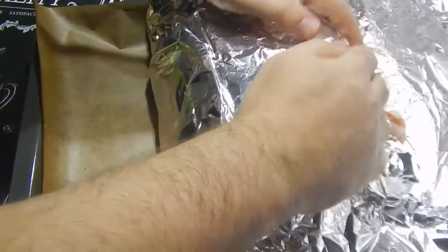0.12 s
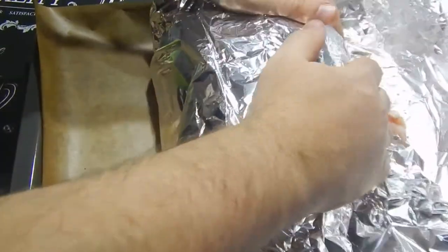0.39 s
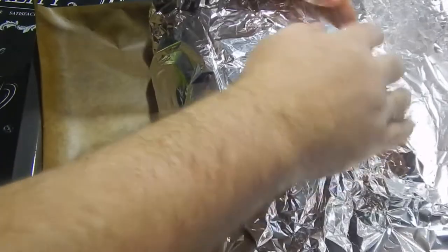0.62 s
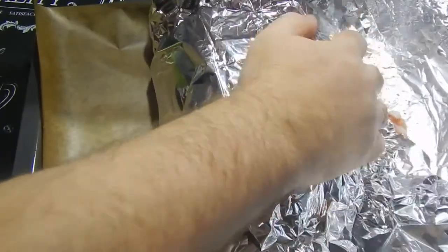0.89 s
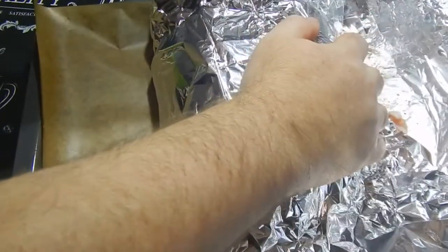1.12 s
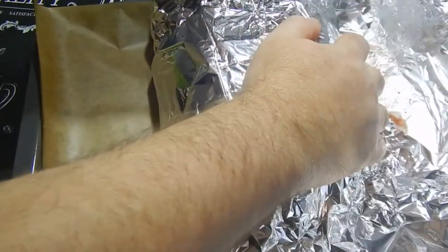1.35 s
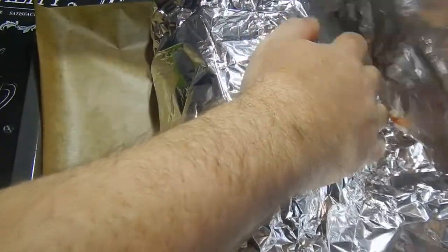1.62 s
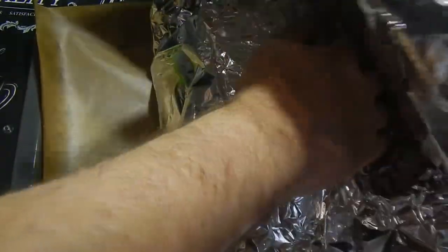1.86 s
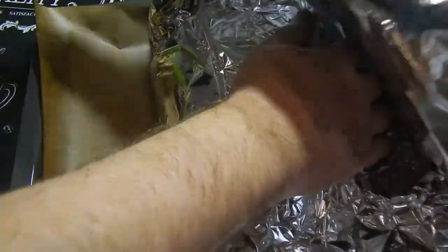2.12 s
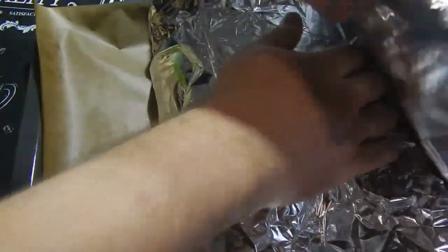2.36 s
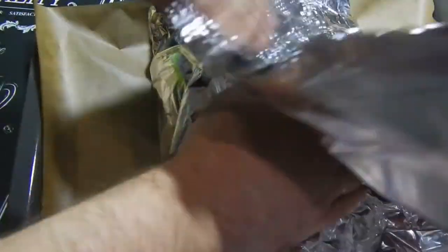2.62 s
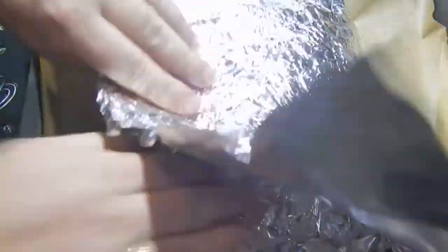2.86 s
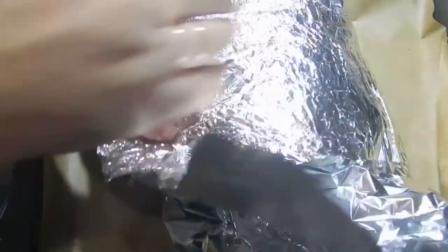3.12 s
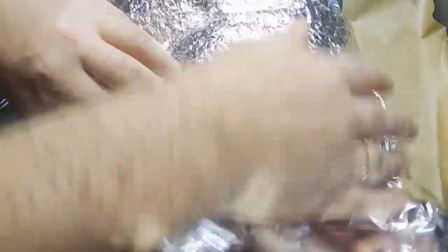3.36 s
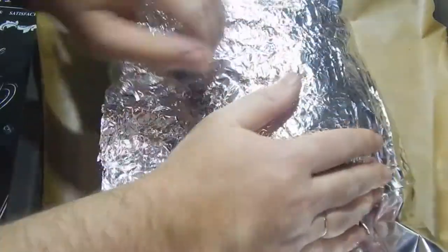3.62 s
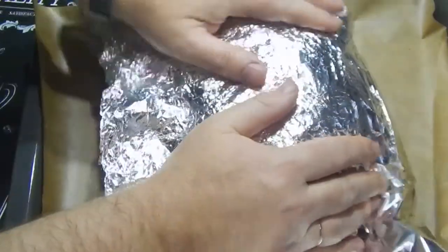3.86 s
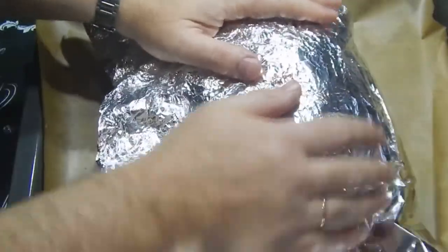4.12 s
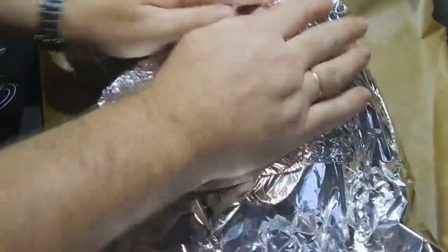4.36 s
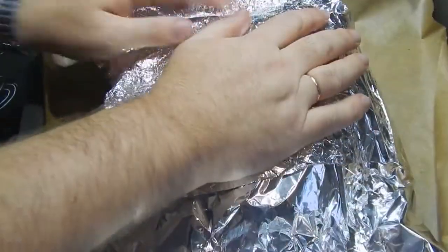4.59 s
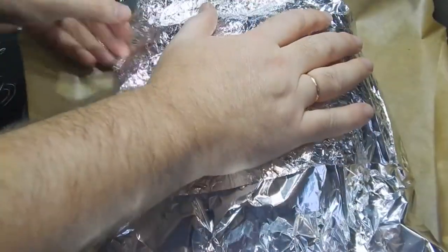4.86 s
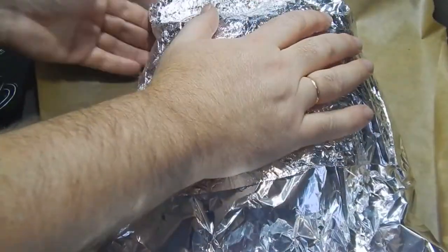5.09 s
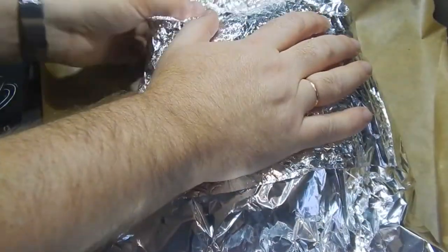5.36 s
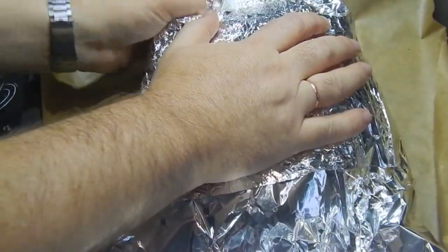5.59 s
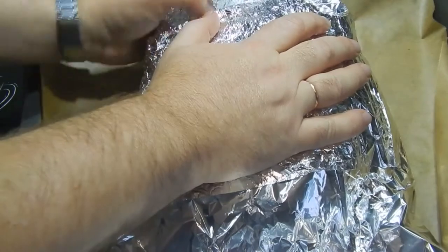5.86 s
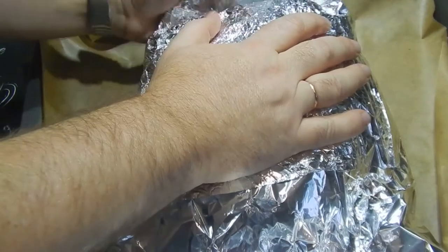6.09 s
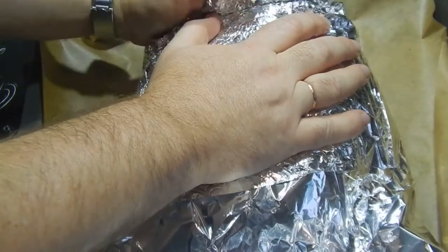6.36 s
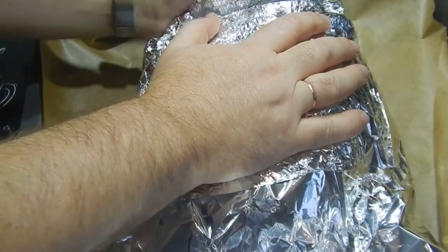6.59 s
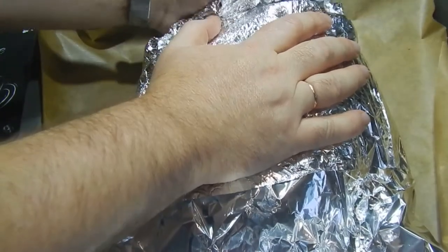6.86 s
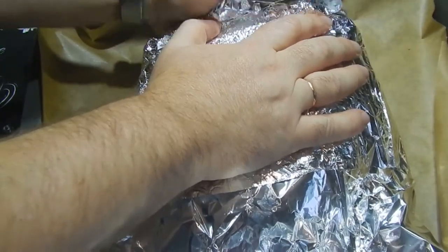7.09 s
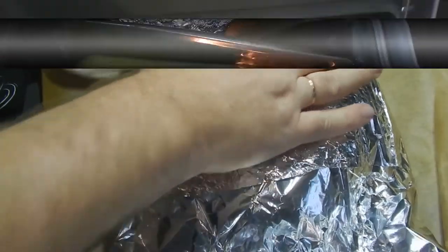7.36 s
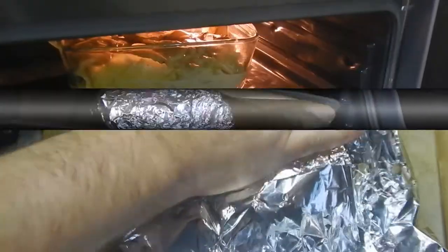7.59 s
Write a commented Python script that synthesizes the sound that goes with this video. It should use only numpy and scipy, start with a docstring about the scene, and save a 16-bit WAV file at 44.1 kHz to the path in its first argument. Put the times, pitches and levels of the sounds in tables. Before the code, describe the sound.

Stereo close microphone, dry small room: dense foil rustle, fizzing and popping, mostly slightly left of centre. Early crinkles pause, then big sheet folds hiss and crackle, pressing makes the tray boom softly. Later handling is choppier, with single bright ticks, thinning out to small rustles and a weak wavering hum.

```python
"""In a small kitchen, hands fold and press aluminium foil round a roast on a baking tray, close to a camera.
Fingers drag over the foil and thousands of tiny creases snap, each a sine that swells and dies.
Small creases fizz, middling ones crackle, larger facets buckle and ring briefly; filtered noise is the thud.
The tray's resonances boom under the pressing, and the room adds a short diffuse tail.
At the end a low, wavering hum enters. Two narrow notch filters sit in the camera's sound path."""
import sys
import numpy as np
from scipy import signal
from scipy.fft import rfft, irfft, next_fast_len
from scipy.io import wavfile
from scipy.ndimage import map_coordinates

SR = 44100
rng = np.random.default_rng(int(sys.argv[2]) if len(sys.argv) > 2 else 0)


def unload_audio(sound):
    """Save the sound as a 16-bit wav file, at the path given as the first command line argument."""
    columns = np.transpose(np.atleast_2d(sound))
    # keep every value between -1 and 1, then stretch to whole-number steps
    steps = np.round(np.clip(columns, -1, 1) * 32767)
    wavfile.write(sys.argv[1], SR, steps.astype(np.int16))


def volts_from_db(level):
    """Convert decibel levels to linear amplitude ratios."""
    exponent = np.asarray(level, float) / 20
    return 10 ** exponent


N = 340452

# Where the foil is worked. Each row: time in seconds, facet pitch in Hz,
# left-right balance in dB (positive is left).
WORKED_PLACE = [(0.0, 1520, -6.5), (0.19, 1158, -7.5), (0.73, 1313, -1), (0.84, 1706, -6), (1.24, 1490, -2),
                (1.35, 1150, -14), (1.44, 1400, -7.0), (2.51, 1447, -5.5), (3.03, 1380, -0.5),
                (3.38, 1046, -2), (3.59, 1540, -2.0), (4.26, 1224, -2.0), (5.01, 1557, 3.0), (5.1, 1030, 2),
                (5.16, 1716, 3.5), (5.44, 1220, -2), (5.61, 1710, -2), (5.68, 980, -3), (5.76, 1630, 0.0),
                (5.83, 1147, -0.5), (6.56, 1482, -4.5), (6.64, 995, -5.5), (7.07, 1587, -6.5),
                (7.1, 1220, -1), (7.46, 1268, -8), (7.72, 1450, -3)]


def unit(x):
    """Normalisation: the signal scaled to an rms of 1."""
    return x / np.sqrt(np.mean(x ** 2) + 1e-20)


def along(points, hz):
    """Interpolation of (Hz, value) points on a logarithmic frequency axis."""
    f, v = np.transpose(points)
    return np.interp(np.log(hz + 1), np.log(f + 1), v)


def read(rows, s):
    """Linear interpolation in time: each column after the first, at times s."""
    times, *columns = np.transpose(rows)
    return [np.interp(s, times, c) for c in columns]


def wobble(rate):
    """Band-limited random modulation: a smooth curve through random knots, rate knots a second."""
    knots = rng.standard_normal(int(N * rate / SR) + 4)
    return map_coordinates(knots, [np.arange(N) * rate / SR])


def filtered(x, response):
    """Linear filtering: the spectrum of x times a complex response of frequency."""
    m = next_fast_len(N + SR // 2)
    return irfft(rfft(x, m) * response(np.fft.rfftfreq(m, 1 / SR)), m)[..., :N]


def coloured(x, spectrum):
    """Spectral shaping: x through a zero-phase filter of (Hz, gain in dB) points, scaled to rms 1."""
    return unit(filtered(x, lambda hz: volts_from_db(along(spectrum, hz))))


def swells(s, hold_s, db, rise, fall):
    """Energy addition: dB level of overlapping gestures that rise, hold and die at rates in dB per second."""
    t = np.arange(0, N, 64) / SR
    late = t - s[:, None]
    rising_db = rise * np.minimum(late, 0)
    dying_db = np.c_[fall] * np.maximum(late - hold_s[:, None], 0)
    each_db = db[:, None] + rising_db - dying_db
    total_db = 10 * np.log10(np.sum(volts_from_db(each_db) ** 2, axis=0) + 1e-12)
    return np.interp(np.arange(N) / SR, t, total_db)


def pings(s, gain, hz, cycles, lag_s, pan_db, size):
    """Damped vibration: sines swell for some cycles and die, with a time and level difference at two ports."""
    out = []
    for side in (1, -1):  # left, right
        start = np.clip(s + side * lag_s / 2, 0, N / SR) * SR
        where = np.ceil(start)[:, None] + np.arange(size)
        turns = ((where - start[:, None]) / SR * hz[:, None]).astype(np.float32)
        age = turns / cycles[:, None].astype(np.float32)
        envelope = age * np.exp(1 - age)
        port_gain = (gain * volts_from_db(side * pan_db / 2))[:, None]
        wave = np.sin(2 * np.pi * turns) * envelope * port_gain
        out.append(np.bincount(where.astype(int).ravel(), wave.ravel(), N + size + 1)[:N])
    return np.array(out)


def creases(count, centre_hz, spread, cycles, spiky_db, clumps_db, lag_s, size):
    """Crackling noise: a shower of snaps, random in time, pitch and strength, with clumped loudness, rms 1."""
    u, g = rng.random((count, 2)), rng.standard_normal((count, 4))
    s = u[:, 0] * N / SR
    hz = np.clip(centre_hz(s) * np.exp(spread * g[:, 3]), 200, 0.4 * SR)
    rare = -np.log(1 - u[:, 1] * 0.998)  # exponentially distributed
    gain = np.sqrt(hz) * volts_from_db(clumps_db[(s * SR).astype(int)] + spiky_db * rare)
    # the farther port hears a snap later
    lag = lag_s * g[:, 1] - 0.75e-5 * read(WORKED_PLACE, s)[1]
    return unit(pings(s, gain, hz, cycles * np.exp(0.17 * g[:, 0]), lag, 4.3 * g[:, 2], size))


def fizz(fizz_db, facet_db, clumps_db):
    """High-frequency snapping: tiny creases over dense noise, brighter where the foil buckles less."""
    # Each row: frequency in Hz, relative filter gain in dB.
    fizz_spectrum = [(3200, -18), (4800, -6), (6000, -5), (7500, -3), (10600, 2.5), (13000, -1),
                     (15000, -5), (15800, -11.5)]
    # Slow drift of the fizz's brightness. Each row: time in seconds, further top-octave lift in dB.
    brightness_drift = [(0, 0), (0.9, 0), (1.3, 3), (2.4, 1), (3.2, 0), (4.3, 0), (4.8, -2.5), (5.4, -1),
                        (6.4, 0), (6.8, -6), (7.2, -3.5), (7.72, -1)]
    shine_per_db, crumpled_db = 0.39, -8  # at facets 8 dB under the fizz the shine is 0 dB before the drift
    small = creases(count=40000, centre_hz=lambda s: 9500, spread=0.5, cycles=0.54, spiky_db=1.5,
                    clumps_db=clumps_db, lag_s=6e-5, size=28)
    # the finest creases are too many to hear apart and merge into hiss
    finest = 1.08 * volts_from_db(clumps_db) * rng.standard_normal((2, N))
    even = coloured(small + finest, fizz_spectrum)
    top = filtered(even, lambda hz: 1 / (1 + (8500 / (hz + 1)) ** 6))
    shine_db = np.clip(shine_per_db * (crumpled_db + fizz_db - facet_db), -9, 7)
    shine_db = shine_db + read(brightness_drift, np.arange(N) / SR)[0]
    return even + (volts_from_db(shine_db) - 1) * top


def crackle(clumps_db):
    """Impulsive buckling at medium scale: middling creases snap between the fizz and the facets in pitch."""
    # Each row: frequency in Hz, relative filter gain in dB.
    crackle_spectrum = [(1100, -15.5), (1900, -4.5), (2700, -2), (4200, -3.5), (5500, -5), (8000, -28)]
    middling = creases(count=11000, centre_hz=lambda s: 3300, spread=0.384, cycles=1.13, spiky_db=-1.0,
                       clumps_db=clumps_db, lag_s=5e-5, size=110)
    return coloured(middling, crackle_spectrum)


def facets(clumps_db):
    """Plate buckling: large facets snap near the pitch of the fold being worked, and a few ring on."""
    # Each row: frequency in Hz, relative filter gain in dB.
    facet_spectrum = [(350, -20.5), (600, 0), (1000, -1), (1600, -1), (2300, 3), (3300, -12), (5000, -44)]
    fold_hz = lambda s: read(WORKED_PLACE, s)[0]
    large = creases(count=9000, centre_hz=fold_hz, spread=0.45, cycles=1.15, spiky_db=0.7,
                    clumps_db=clumps_db, lag_s=6e-5, size=230)
    ringing = creases(count=900, centre_hz=fold_hz, spread=0.249, cycles=6.2, spiky_db=1.5,
                      clumps_db=clumps_db, lag_s=6e-5, size=1100)
    return coloured(large + 0.58 * ringing, facet_spectrum)


def tray_boom(facet_db, clumps_db):
    """Modal resonance: presses and, more weakly, buckling facets kick the hollow tray's modes."""
    # Modes of the tray. Each row: frequency in Hz, width in Hz, relative level in dB.
    modes = [(368.7, 49, -3.5), (455.3, 40, 3), (537, 38, -1), (617, 90, -5.5)]
    # Presses that kick the tray. Each row: time in seconds, hold in seconds, relative level in dB.
    presses = [(-0.005, 0.047, -52.5), (0.217, 0.055, -43.5), (0.4, 0.049, -47), (0.56, 0.093, -51.5),
               (0.662, 0.001, -50.7), (0.843, 0.073, -61), (0.966, 0.001, -67), (1.364, 0.001, -57.5),
               (1.469, 0.07, -53), (1.731, 0.18, -49), (1.932, 0.0047, -47.5), (2.37, 0.11, -52.5),
               (2.554, 0.00032, -46.5), (2.67, 0.18, -48), (2.846, 0.052, -38), (3.094, 0.298, -50.9),
               (3.444, 0.16, -44), (3.846, 0.16, -37), (4.143, 0.139, -56.5), (4.32, 0, -46),
               (4.445, 0.0055, -35.5), (4.522, 0.001, -38), (4.79, 0.051, -52), (5.078, 0.037, -58),
               (5.216, 0.0, -63.5), (5.327, 0.002, -55.3), (5.388, 0.011, -46), (5.51, 0.001, -42.5),
               (5.673, 0.001, -47), (5.901, 0.0, -38.5), (5.984, 0.0, -31), (6.253, 0.001, -42),
               (6.752, 0.011, -50.5), (6.917, 0.001, -44.5), (7.024, 0.002, -56), (7.117, 0.001, -63),
               (7.378, 0.036, -63), (7.587, 0.001, -64)]
    press_db = swells(*np.transpose(presses), rise=360, fall=152.5)
    gain = np.hypot(volts_from_db(press_db), volts_from_db(facet_db - 14.5))
    kicks = creases(count=4000, centre_hz=lambda s: 480, spread=0.26, cycles=0.51, spiky_db=1.6,
                    clumps_db=clumps_db, lag_s=6e-5, size=200)

    def hollow(f):
        """Sum of resonances in alternating sign."""
        total = 0
        for k, (centre, width, db) in enumerate(modes):
            damping = 1j * f * width
            total = total + (-1) ** k * volts_from_db(db) * damping / (centre ** 2 - f ** 2 + damping)
        return total

    return volts_from_db(1.2 * wobble(18) - 1.5) * gain * unit(filtered(kicks, hollow))


def parcel_thud(facet_db):
    """Low-frequency forcing: noise, largely common to both ports, swells as the parcel's weight shifts."""
    # Each row: frequency in Hz, relative filter gain in dB.
    thud_spectrum = [(25, -17), (60, -10), (110, -5), (135, -3.5), (163, -2), (195, -8.5), (300, -6.5),
                     (420, -13.5), (700, -90)]
    # Shifts of weight. Each row: time in seconds, hold in seconds, level in dB.
    shifts = [(0.009, 0.031, -62), (0.307, 0.085, -54), (0.536, 0.13, -63), (0.772, 0.0094, -64),
              (0.852, 0.0068, -61), (1.161, 0.13, -83), (1.364, 0.029, -73), (1.633, 0.011, -65),
              (1.759, 0.033, -51.0), (1.91, 0.001, -50), (2.169, 0.009, -64.5), (2.342, 0.032, -53.5),
              (2.563, 0.0091, -53.5), (2.695, 0.011, -57.1), (2.81, 0.13, -57.4), (3.15, 0.001, -57.5),
              (3.344, 0.006, -62), (3.468, 0.03, -52.5), (3.576, 0.018, -51), (3.846, 0.0089, -45.5),
              (3.988, 0.001, -45), (4.259, 0.11, -60), (4.437, 0.083, -52), (4.77, 0.037, -63),
              (4.91, 0.001, -52), (5.41, 0.001, -70), (5.539, 0.04, -66), (5.747, 0.015, -66),
              (5.898, 0.2, -54.5), (6.398, 0.001, -79.1), (6.65, 0.003, -59.5), (6.793, 0.094, -61.5),
              (7.38, 0.08, -65), (7.56, 0.16, -62)]
    shift_db = swells(*np.transpose(shifts), rise=379, fall=114)
    # buckling facets move the parcel too, more weakly
    gain = np.hypot(volts_from_db(shift_db), volts_from_db(facet_db - 28))
    noise = rng.standard_normal(N) + 0.46 * rng.standard_normal((2, N))
    return gain * coloured(noise, thud_spectrum)


def foil():
    """Superposition: five sizes of movement follow the hands, shaded as the action drifts left and right."""
    # The hands' strokes. Each row: time of full strength in seconds, hold in seconds, relative fizz level in dB,
    # large facets over the fizz in dB, dying away in dB per second.
    strokes = [(-0.005, 0.013, -38, -10, 109.5), (0.154, 0.071, -37.5, -2.5, 230.0),
               (0.227, 0.035, -34.5, -6.5, 240.0), (0.278, 0.009, -32.5, -5, 51.5),
               (0.37, 0.021, -33, -5, 370.0), (0.564, 0.1, -62.5, 11.9, 189),
               (0.809, 0.063, -48.5, -4.8, 140.0), (1.05, 0.008, -72, -1, 220.0),
               (1.078, 0.024, -65.5, -14.3, 220.0), (1.223, 0.002, -77.7, -5, 180.0),
               (1.271, 0.001, -71, -5, 220.0), (1.37, 0.0036, -35.5, -12.5, 59),
               (1.453, 0.033, -34.5, -11.5, 128), (1.522, 0.001, -41, -6.5, 190.0),
               (1.578, 0.017, -35.5, -10, 280.0), (1.635, 0.19, -37, -12, 112), (1.809, 0.11, -35, -8, 108),
               (1.994, 0.039, -38, -12, 233), (2.276, 0.004, -68, -4, 184), (2.354, 0.023, -31.5, -15, 46),
               (2.539, 0.097, -33.0, -9, 210.0), (2.65, 0.013, -29.5, -13.5, 55),
               (2.721, 0.015, -31.5, -13, 85), (2.839, 0.06, -32.5, -9, 160.0),
               (3.109, 0.052, -36.5, -8.0, 150.0), (3.172, 0.013, -36.5, -8, 39),
               (3.322, 0.024, -40, -4.5, 215), (3.387, 0.094, -30.0, -9.5, 101.5),
               (3.477, 0.098, -31.5, -8, 80.0), (3.639, 0.01, -32, -6.5, 251),
               (3.826, 0.067, -27.5, -7.5, 39.5), (3.978, 0.019, -27, -6.6, 148),
               (4.151, 0.031, -33.5, -10.6, 198), (4.224, 0.021, -36.5, -6, 220.0),
               (4.323, 0.084, -41, -1.2, 205), (4.408, 0.061, -28, -4.5, 133),
               (4.694, 0.0085, -61, 4.5, 282), (4.789, 0.11, -71, 26.5, 210.0),
               (4.881, 0.028, -27.5, -4, 164), (4.977, 0.021, -35.5, -9.5, 160.0),
               (5.071, 0.005, -38, -3.5, 100.0), (5.176, 0.094, -36.5, -10, 160.0),
               (5.29, 0.0083, -29.5, -11, 101), (5.376, 0.017, -29.5, -6.5, 47),
               (5.5, 0.038, -35.5, -8.5, 220.0), (5.62, 0.112, -43.5, -8, 220.0),
               (5.69, 0.048, -33.5, -5.5, 320.0), (5.807, 0.064, -37, -0.5, 200.0),
               (5.91, 0.086, -31, -5.5, 71), (6.095, 0.062, -31.5, -7.0, 128),
               (6.186, 0.032, -35.5, -5.5, 180.0), (6.245, 0.033, -31.5, -6.5, 217),
               (6.404, 0.002, -47.5, -7.5, 170.0), (6.523, 0.005, -74, 12, 420.0),
               (6.657, 0.005, -44, 1.5, 380.0), (6.722, 0.004, -35.5, -3.2, 140.0),
               (6.859, 0.097, -36.5, -3.5, 160.0), (6.973, 0.14, -38.5, -13, 160.0),
               (7.178, 0.0086, -50, -11, 320.0), (7.238, 0.0063, -46.5, -12.5, 160.0),
               (7.282, 0.055, -49, -13, 134), (7.458, 0.092, -65.5, -6, 170.0),
               (7.533, 0.1, -39.0, -9.5, 230.0), (7.677, 0.034, -40, -11, 170.0)]
    s, hold_s, db, coarse_db, fall = np.transpose(strokes)
    rise = 557  # dB per second
    fizz_db = swells(s, hold_s, db, rise, fall)
    crackle_db = swells(s, hold_s, db + 0.6 * coarse_db - 4, rise, fall)
    facet_db = swells(s, hold_s, db + coarse_db, rise, fall)
    # one crease sets off its neighbours, so all sizes clump together
    clumps_db = 0.6 * wobble(14) + 0.86 * wobble(40) + 0.85 * wobble(110) + 0.44 * wobble(300)
    # the camera body shades the far port more from short waves than from long ones
    shade_db = read(WORKED_PLACE, np.arange(N) / SR)[1] * [[0.5], [-0.5]]
    fine = volts_from_db(fizz_db - 0.5 + 0.93 * shade_db) * fizz(fizz_db, facet_db, clumps_db)
    medium = volts_from_db(crackle_db + 0.4 * shade_db) * crackle(clumps_db)
    coarse = volts_from_db(facet_db - 2.5) * facets(clumps_db) + tray_boom(facet_db, clumps_db)
    return fine + medium + volts_from_db(0.25 * shade_db) * coarse + parcel_thud(facet_db)


def kitchen(x, wet_db):
    """Reverberation: a short diffuse tail, drawn afresh every third of a second so no one colouring persists."""
    # Each row: frequency in Hz, 60 dB decay time in seconds.
    decay = [(200, 0.1), (2000, 0.16), (10000, 0.08)]
    step = SR // 3
    wet = np.zeros((2, N + 3 * step))
    for start in range(0, N, step):
        hz, t, z = signal.stft(rng.standard_normal((2, step)), SR, nperseg=256)
        # the bass is nearly alike at both ports, the treble is not
        apart = np.clip(hz / 3500 + 0.2, 0, 1)[:, None]
        z = np.array([z[0] + apart * z[1], z[0] - apart * z[1]]) / np.sqrt(1 + apart ** 2)
        dying = volts_from_db(-60 * t / along(decay, hz)[:, None])
        tail = signal.istft(z * dying, SR, nperseg=256)[1]
        tail = tail / np.linalg.norm(tail[0])
        answer = signal.fftconvolve(x[:, start:start + step], tail, axes=1)
        wet[:, start:start + answer.shape[1]] += answer
    return x + volts_from_db(wet_db) * wet[:, :N]


def faint_hiss():
    """White noise: equal power at all frequencies, independent at each port."""
    return volts_from_db(-87.5) * rng.standard_normal((2, N))


def snaps():
    """Sudden release of strain: the loudest creases ping singly, then a flurry of smaller ones dies away."""
    # Loud snaps and, at low pitch, knocks. Each row: time of the peak in seconds, peak level in dB,
    # pitch in Hz, rise in cycles, left-right balance in dB (positive is left).
    single_snaps = [(0.1612, -33.5, 1110, 1.36, -3), (0.2056, -28.5, 1048, 1.28, 0),
                    (0.2303, -29.5, 1090, 1.23, -4), (0.2847, -26, 2280, 1.14, -1),
                    (0.3331, -38, 1104, 1.7, -6), (0.84, -41, 1710, 4.0, 5), (1.0496, -59, 1560.0, 3.95, 9),
                    (1.0811, -48, 9830.0, 0.9, -7), (1.1141, -48, 10500, 1.3, -11),
                    (1.2735, -52, 10000.0, 0.9, -8), (1.3143, -50.5, 11100.0, 0.9, -5),
                    (1.3694, -35, 800, 1.17, 4), (1.4419, -38, 980, 0.62, -3.0),
                    (1.6328, -22, 10290.0, 0.88, -10), (1.7502, -27.5, 2230, 0.86, 4),
                    (2.001, -19, 11200, 1.1, -3.5), (2.1079, -45.5, 2320, 1.9, 5),
                    (2.182, -49, 356, 6.5, -1.0), (2.2777, -47, 9520.0, 0.9, -9), (2.327, -47, 130, 0.8, 0),
                    (2.3392, -18.5, 11800, 1.4, -19), (2.856, -25.5, 596, 0.81, 5.5),
                    (3.2748, -20.5, 12270.0, 0.9, 1), (3.3895, -14, 10540.0, 1.04, -2.5),
                    (3.9237, -11.5, 11340.0, 1.1, 1), (4.0093, -22, 2520, 0.8, -7),
                    (4.7654, -40, 900, 1.5, -1), (4.7794, -32, 1610, 1.6, -1), (4.8466, -30, 1600, 2.8, 2),
                    (4.8645, -22, 1780, 0.79, -4), (4.887, -29, 1790, 0.53, -2),
                    (4.9185, -31, 1650, 1.3, -6), (4.9932, -14, 9500, 0.42, 5),
                    (5.0863, -42, 990, 3.56, -1.0), (5.2038, -33.5, 1700, 1.05, 0.0),
                    (5.436, -14, 10300, 0.7, -1), (5.6254, -22, 10400, 0.9, -1),
                    (5.7453, -31.5, 10500, 0.7, -4), (5.7533, -31, 1590, 1.7, -1),
                    (5.8009, -24.5, 2040, 1.2, 0.5), (5.8324, -27, 2010, 0.82, -5),
                    (5.8864, -24, 10230.0, 0.6, -1), (6.1881, -27, 1190, 0.9, 1),
                    (6.272, -27, 1390, 1.14, 1), (6.2712, -19.5, 6800, 0.9, -2),
                    (6.293, -29.5, 1500, 1.34, -1), (6.4104, -27, 11760.0, 1, 0.5),
                    (6.4648, -43, 11910.0, 0.9, 0), (6.4907, -43, 11820.0, 0.9, -6),
                    (6.528, -45.5, 1430, 4.0, -1), (6.645, -46, 110, 0.89, 0),
                    (6.6561, -27, 11100, 1.7, -14.5), (6.6559, -29, 2410, 3.75, -9),
                    (6.7234, -35, 935, 1.44, 1), (6.724, -24, 10800, 0.77, -19),
                    (6.7249, -16.5, 2930, 0.6, -4.5), (6.819, -30.5, 3800, 0.93, -8),
                    (6.8467, -35, 1160, 1.05, -3.0), (6.8832, -29.5, 1480, 1.35, -6),
                    (6.9274, -23, 11200, 0.9, -14.5), (6.9917, -43, 1220.0, 1.3, -7),
                    (7.0323, -25, 6800, 1.2, 0), (7.1248, -27, 10900, 0.9, -2),
                    (7.1575, -32, 5230, 1.34, -4), (7.1816, -25, 10420.0, 0.9, -2),
                    (7.1844, -32, 2620, 1.15, -4), (7.196, -23.5, 10300, 1.2, -3.5),
                    (7.3356, -49, 2820, 1.1, 7.5), (7.4552, -49, 13470.0, 0.9, -14),
                    (7.5395, -47.5, 850, 3.85, 0.5)]
    s, db, hz, cycles, pan_db = np.transpose(single_snaps)
    ping = pings(s - cycles / hz, volts_from_db(db), hz, cycles, -1.1e-5 * pan_db, pan_db, size=3000)
    u, g = rng.random((len(s), 40)), rng.standard_normal((len(s), 40, 3))
    after_s = 0.035 * u ** 1.6
    size_db = db[:, None] - 11.5 - 450 * after_s + 3 * g[..., 0]
    size_db = size_db - 7 * (hz[:, None] < 3500)  # weaker after low snaps
    pitch = np.clip(hz[:, None] * np.exp(0.29 * g[..., 1]), 200, 0.4 * SR)
    rows = (s[:, None] + after_s, volts_from_db(size_db), pitch, 0.83 + 0 * u, 6e-5 * g[..., 2],
            pan_db[:, None] + 0 * u)
    return ping + pings(*map(np.ravel, rows), size=300)


def rubs():
    """Stick-slip friction: each drag is a run of quick slips that ring one taut facet, strongest early on."""
    # Each row: start in seconds, length in seconds, relative level in dB, facet pitch in Hz.
    drags = [(0.758, 0.05, -57, 1030), (0.772, 0.11, -52, 1635), (0.9, 0.15, -69, 1600),
             (4.758, 0.062, -46.5, 850), (4.76, 0.075, -51, 1250), (4.762, 0.07, -52, 1790),
             (6.513, 0.028, -54, 1435), (6.516, 0.017, -66, 497), (6.629, 0.049, -43.5, 900),
             (6.636, 0.04, -44, 2440), (6.637, 0.047, -49, 3400), (6.64, 0.04, -49, 4300),
             (7.273, 0.017, -71, 900), (7.362, 0.05, -63, 355)]
    slips, ring_cycles, pitch_spread = 30, 2.3, 0.075
    s, length_s, db, hz = np.transpose(drags)[..., None]
    u, g = rng.random((len(s), slips)), rng.standard_normal((len(s), slips, 3))
    # keeps the power of a drag independent of its length and pitch
    density = np.sqrt(length_s * hz / (slips * ring_cycles))
    gain = volts_from_db(db + 3.3 * g[..., 0]) * np.sin(np.pi * u ** 0.59) * density
    pitch = hz * np.exp(pitch_spread * g[..., 1])
    rows = (s + length_s * u, gain, pitch, ring_cycles + 0 * u, 4e-5 * g[..., 2], -2.5 + 0 * u)
    return pings(*map(np.ravel, rows), size=2200)


def hum():
    """Harmonic tone: a fundamental that wavers round 113 Hz, with a weak third harmonic."""
    # Each row: time in seconds, level in dB, about which the loudness wavers.
    hum_level = [(7.3, -64), (7.352, -87), (7.386, -52), (7.442, -67), (7.482, -53), (7.528, -69),
                 (7.558, -60), (7.72, -53)]
    s, db = np.transpose(hum_level)
    phase = 2 * np.pi * np.cumsum(113 + 2.47 * wobble(14)) / SR
    tone = np.sin(phase) + 0.23 * np.sin(3 * phase)
    level_db = np.interp(np.arange(N) / SR, s, db, left=-120) + 1.6 * wobble(20)
    return unit(tone) * volts_from_db(level_db)


def scene():
    """Superposition: the foil in the reverberant kitchen, over the hum and a faint hiss."""
    return kitchen(foil() + snaps() + rubs(), wet_db=-5.0) + hum() + faint_hiss()


def low_pass(x):
    """Removes everything above the highest recorded frequency."""
    return signal.sosfilt(signal.butter(12, 16480, fs=SR, output="sos"), x)


def record(dry):
    """Linear filtering in the sound path: a bass cut, a band limit and two narrow notches."""
    # Each row: centre in Hz, width in Hz.
    notches = [(2495, 81), (7495, 110)]

    def path(f):
        """Product of all the filter responses."""
        bass_cut = (1j * f / (45 + 1j * f)) ** 2
        response = bass_cut * (f < 15850)
        for centre, width in notches:
            off_centre = centre ** 2 - f ** 2
            response = response * off_centre / (off_centre + 1j * f * width)
        return response

    mix = filtered(dry, path)
    return low_pass(mix)


dry = scene()
out = record(dry)
unload_audio(out)
```